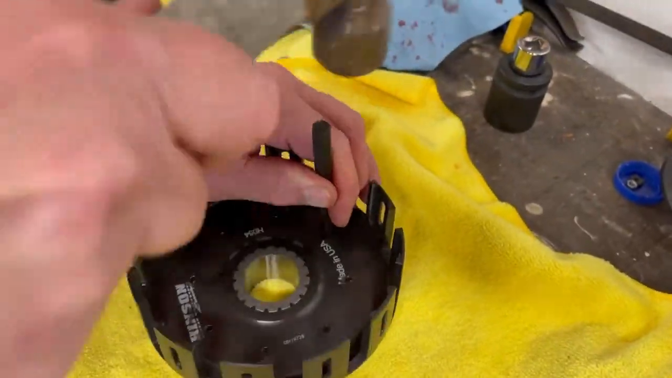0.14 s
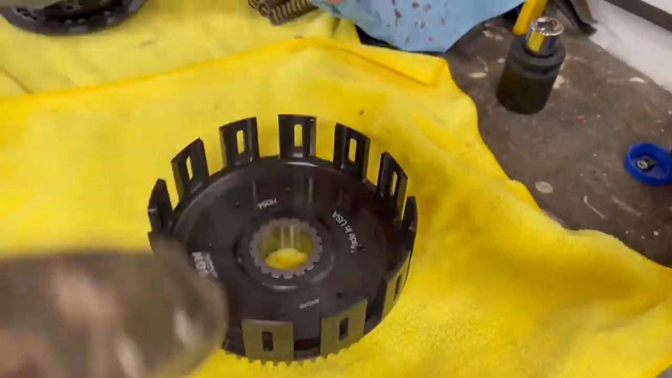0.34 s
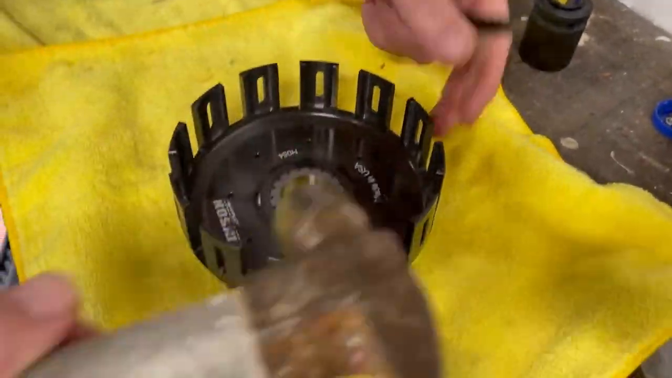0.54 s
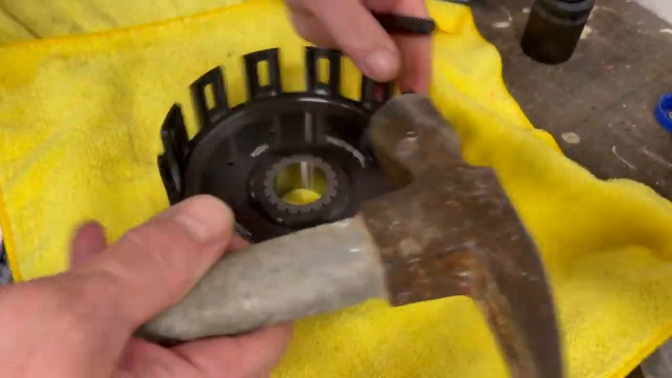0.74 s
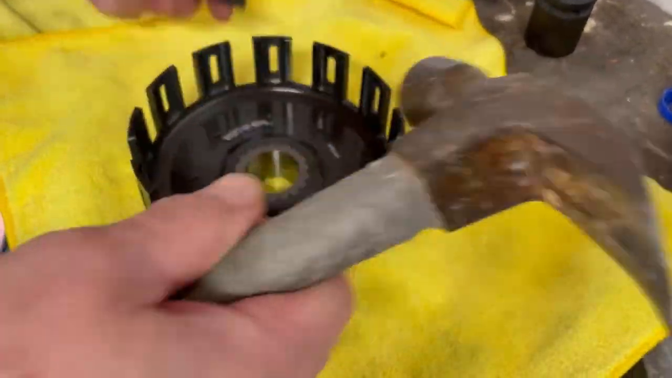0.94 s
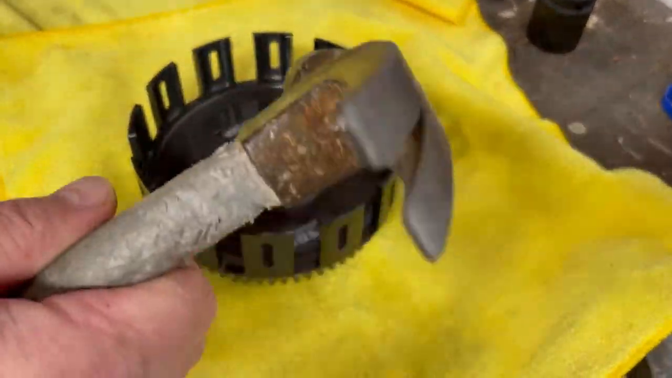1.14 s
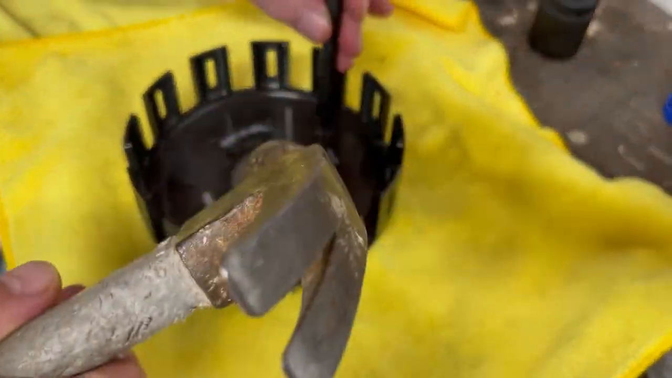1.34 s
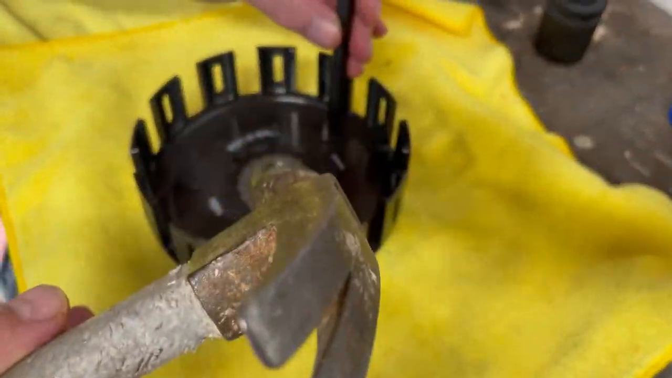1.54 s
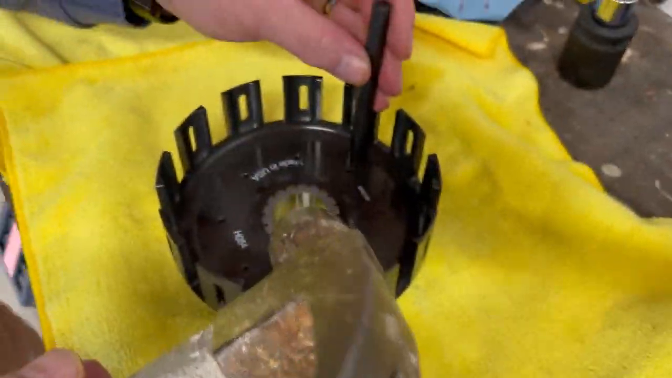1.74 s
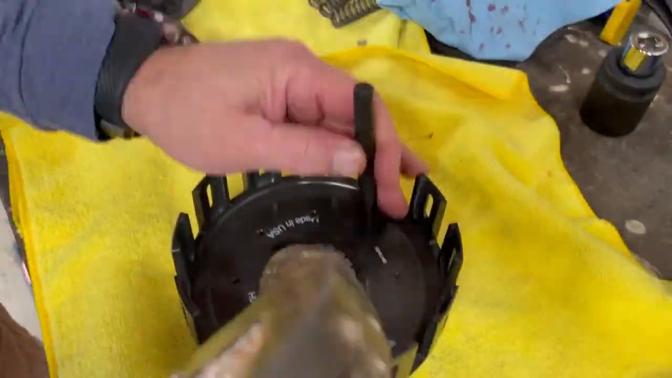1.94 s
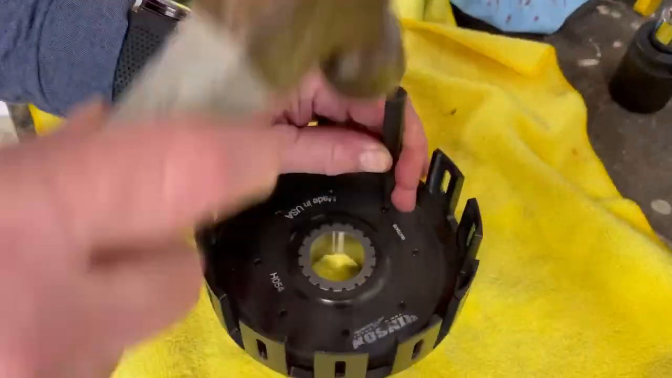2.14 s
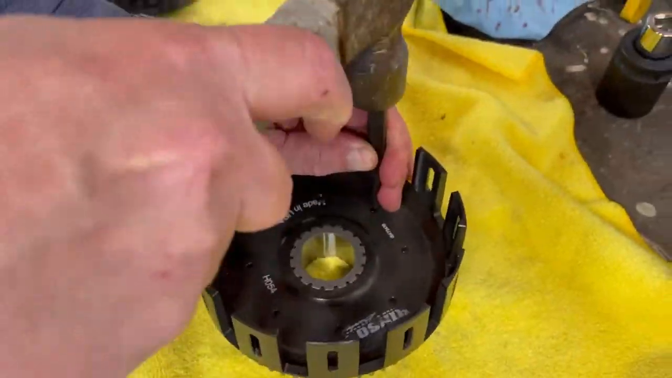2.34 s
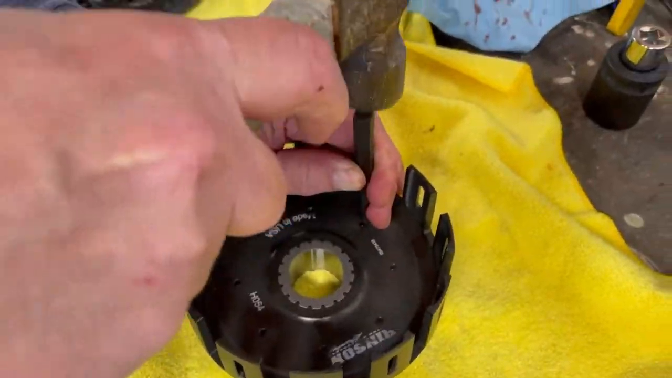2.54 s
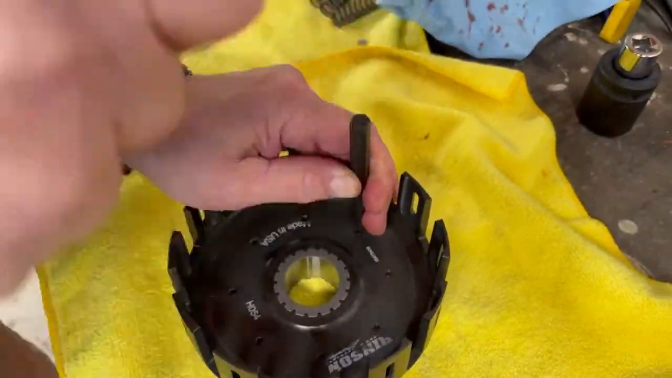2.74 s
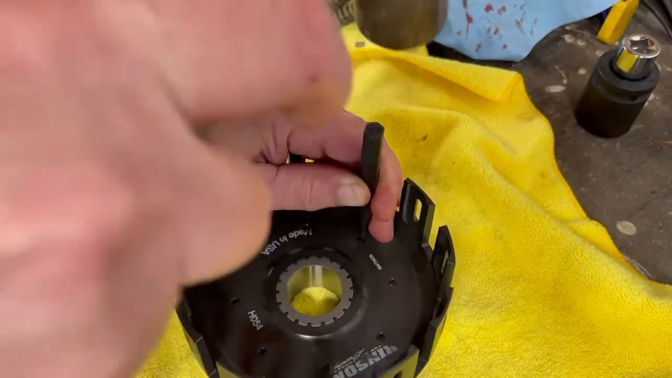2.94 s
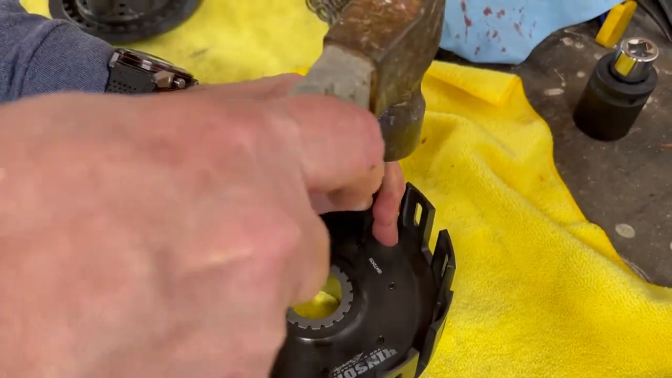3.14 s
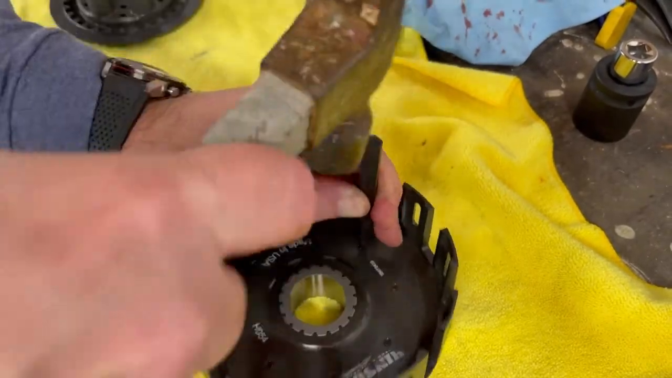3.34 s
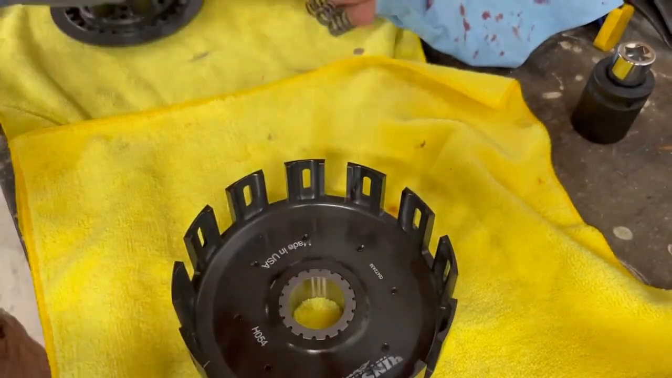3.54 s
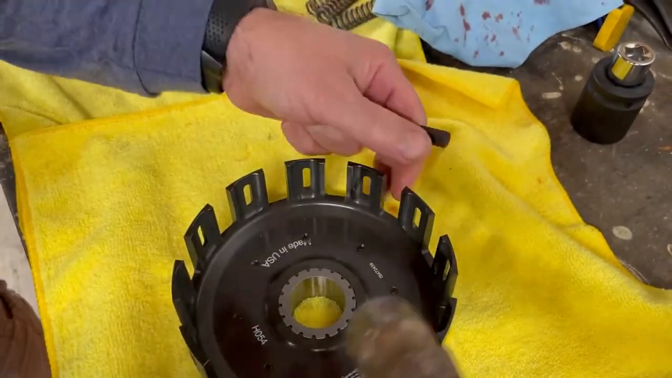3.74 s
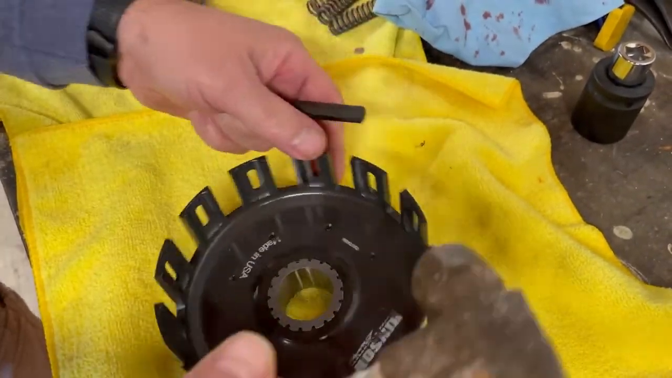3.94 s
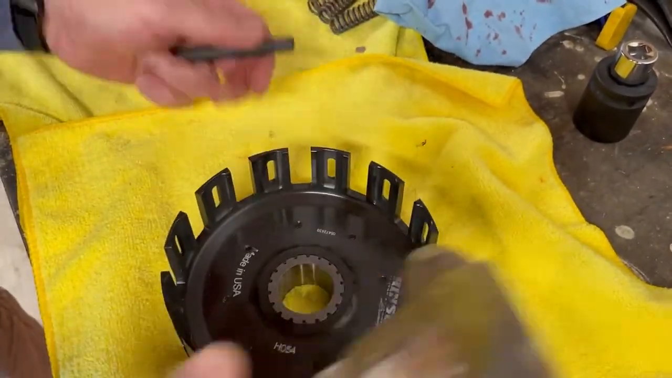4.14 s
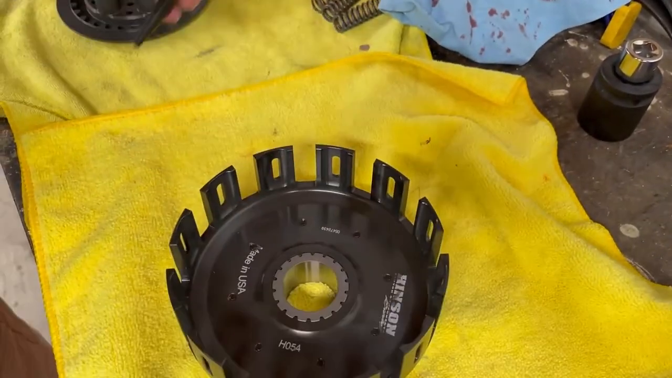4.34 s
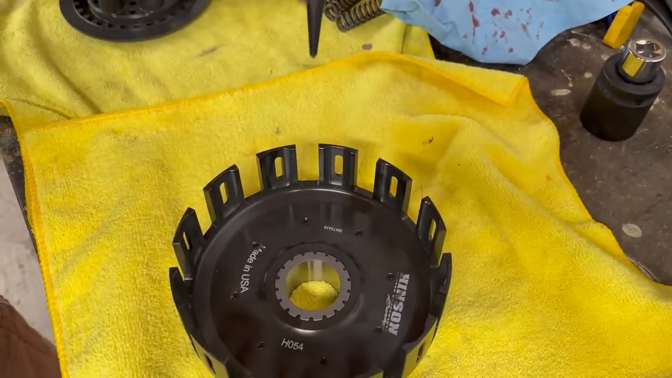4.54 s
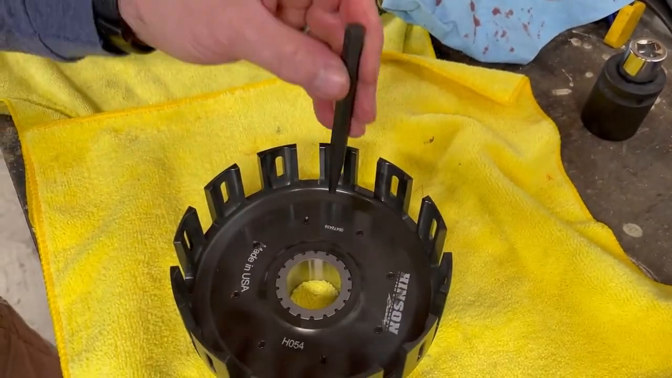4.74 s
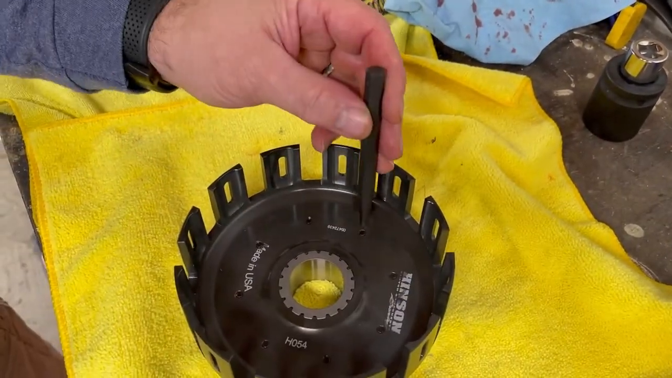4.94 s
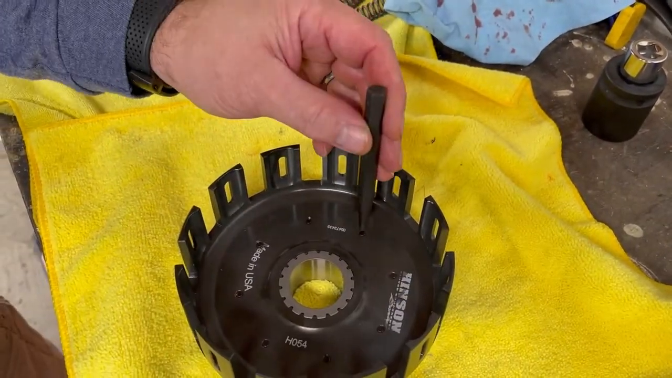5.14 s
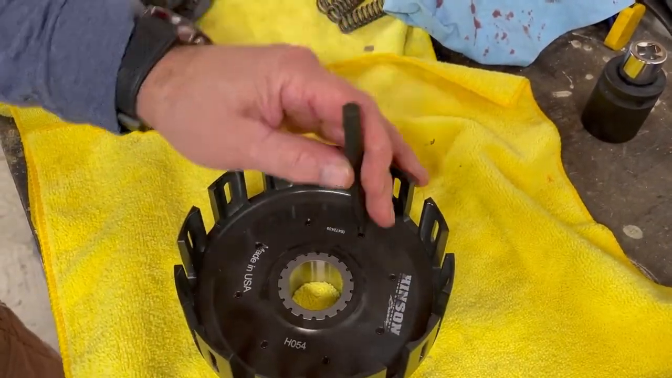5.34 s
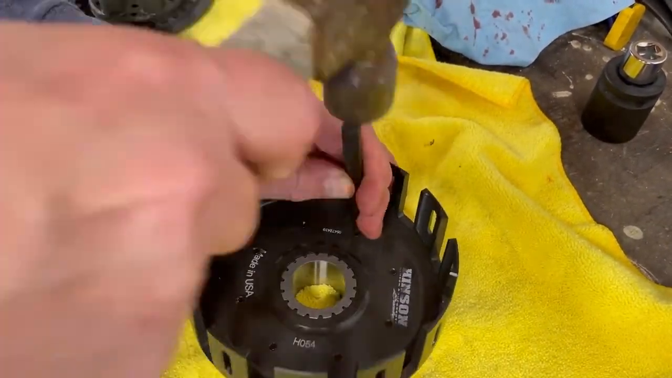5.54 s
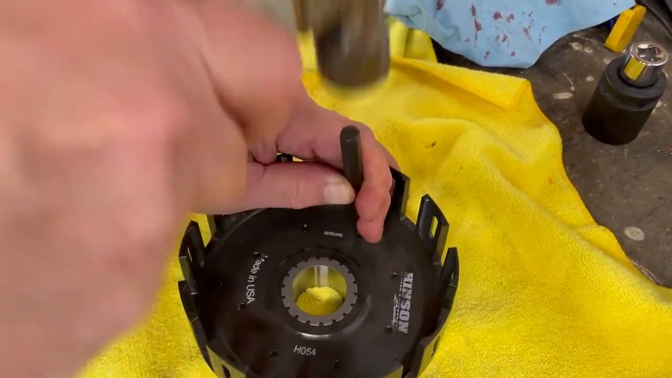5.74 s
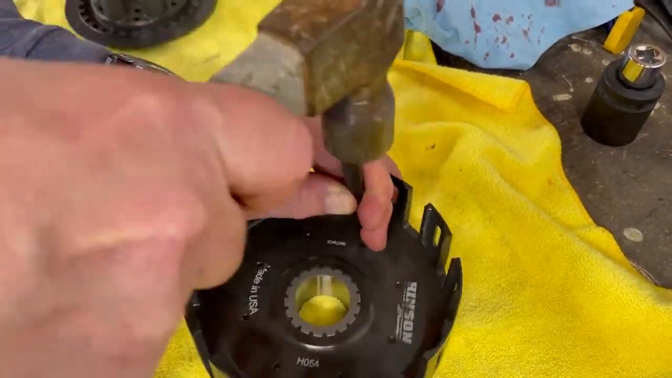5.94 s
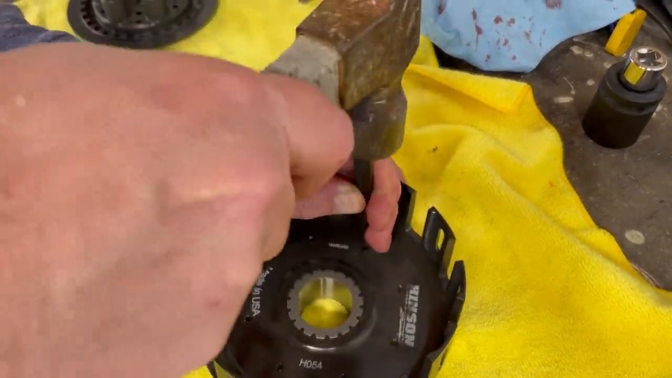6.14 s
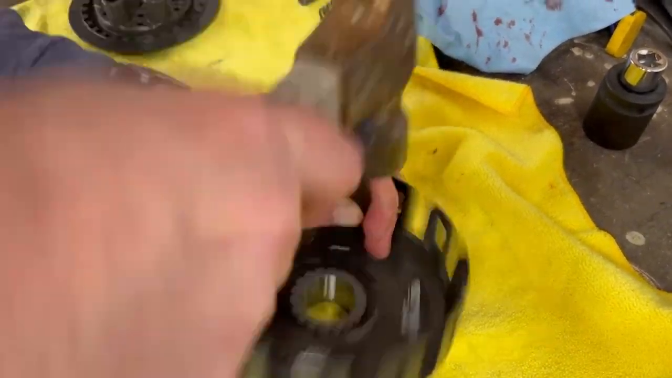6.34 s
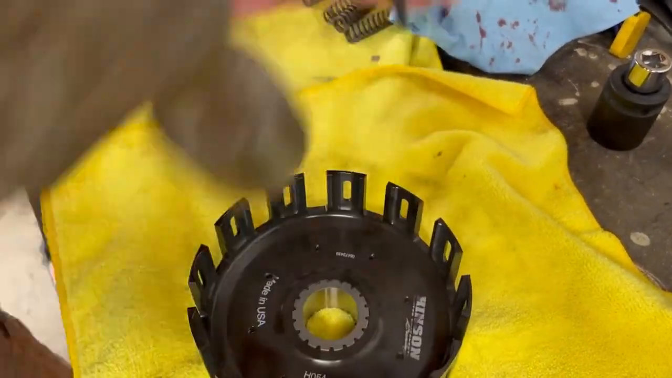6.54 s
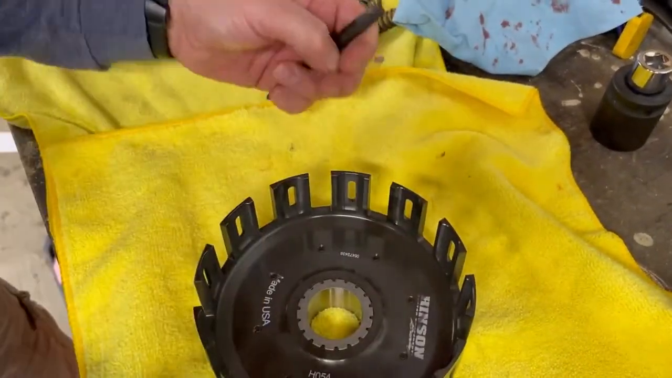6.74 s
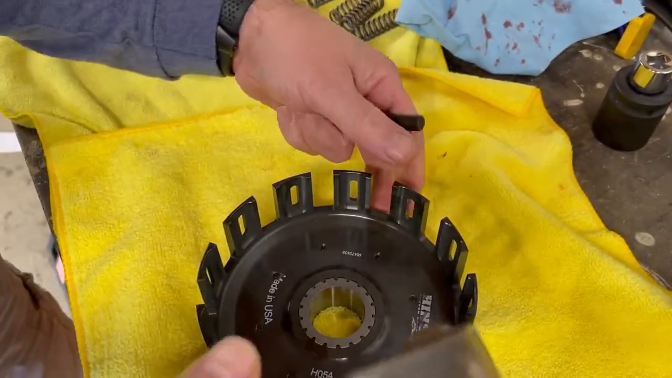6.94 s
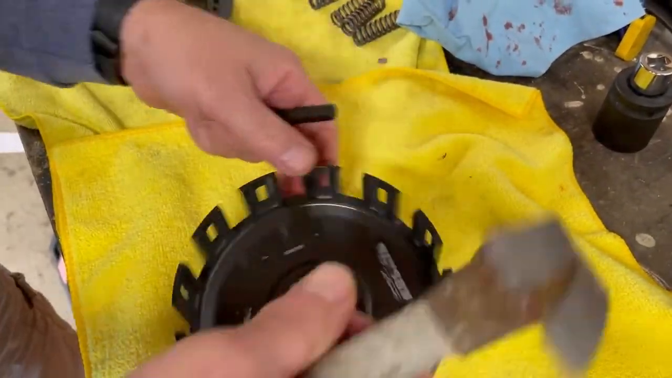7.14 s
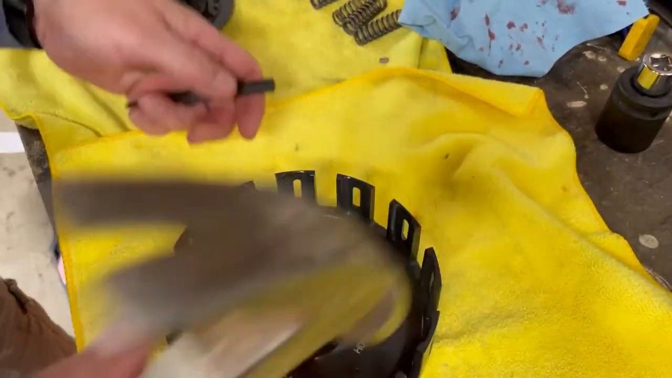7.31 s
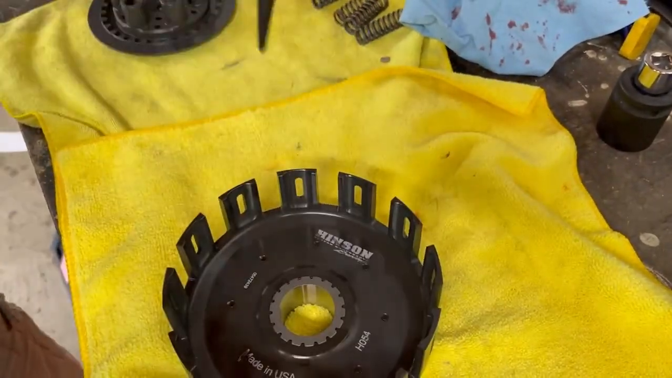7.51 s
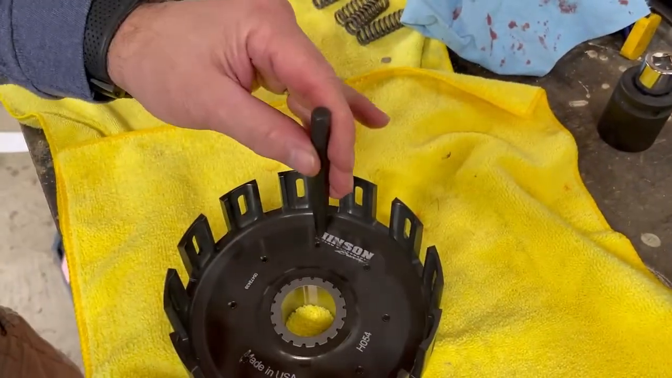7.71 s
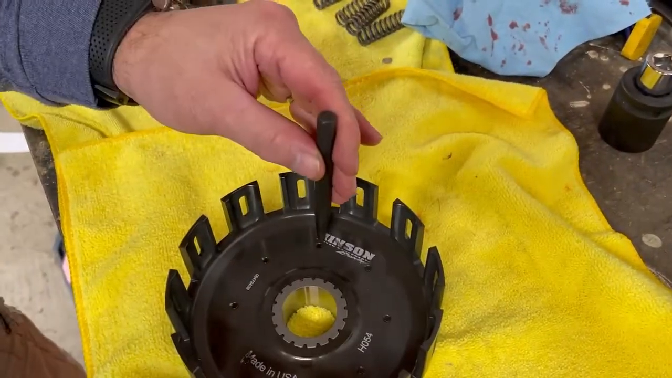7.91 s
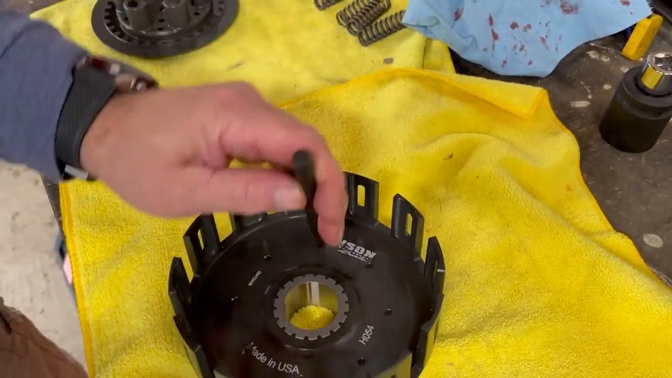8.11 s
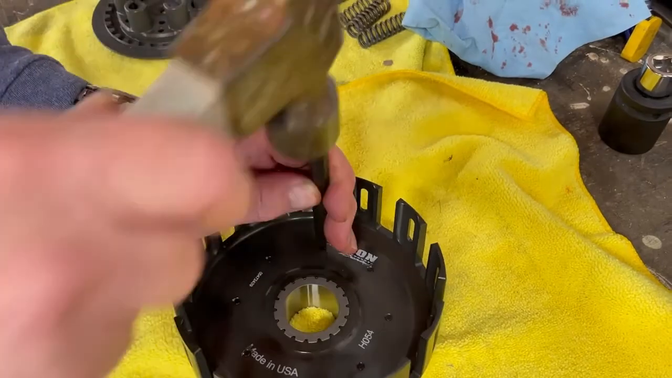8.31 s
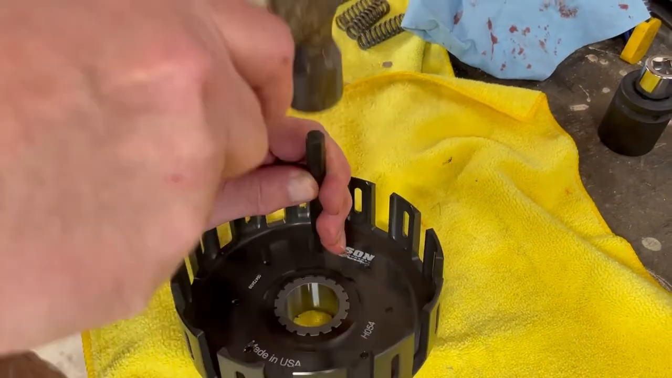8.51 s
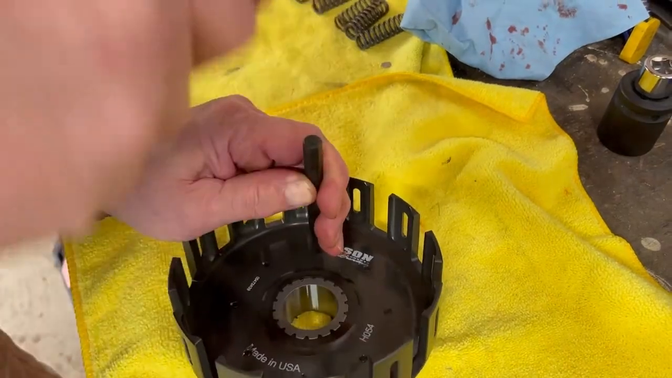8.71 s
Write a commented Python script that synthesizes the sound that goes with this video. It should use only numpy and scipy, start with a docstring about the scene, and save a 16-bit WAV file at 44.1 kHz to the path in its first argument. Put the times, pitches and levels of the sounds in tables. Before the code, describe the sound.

A small workshop heard from close by, in stereo, over very faint low rumble. The tail of a hammer blow opens the scene, then a solid clack with a strong bench thump lands at 0.1 seconds. Soft cloth rustle follows, with tiny metal ticks around 1.5 and a clearer one at 1.7, more near 2. From 2.3 to 3.3 five blows come about a quarter second apart: two light taps, a firmer one, a very hard crack at 2.8, a medium one, then another hard one. Light ticks and cloth brushing fill 3.5 to 3.9; then near quiet until small touches after 5.1. Four blows fall between 5.6 and 6.4, alternating medium and piercingly hard. Faint handling and ticks return from 7.1 to 8.1. Two soft taps at 8.4 and 8.6 lead to a loud final clack at 8.7. Every blow is short and dry, with a bench knock and quickly fading room tail.

```python
"""Hammer blows on a steel pin punch open the scene: each clinks the punch, clacks a cast basket lying
on a cloth and thumps the workbench below; a small workshop answers. Blows come in bursts; between them
the punch ticks on the basket, hands rustle on the cloth and the building rumbles.
Struck bodies are sums of decaying modes, the bench adds a delayed thump, the room is a tail of shaped
noise, and rumble, murmur and rustle are filtered noise under level curves."""
import sys
import numpy as np
from scipy import signal
from scipy.fft import rfft, irfft, next_fast_len
from scipy.io import wavfile
from scipy.ndimage import uniform_filter1d, minimum_filter1d

SR = 44100
rng = np.random.default_rng(int(sys.argv[2]) if len(sys.argv) > 2 else 0)


def pcm_store(signal):
    """Save signal as 16-bit PCM."""
    levels = np.round(np.clip(np.atleast_2d(signal), -1, 1) * 32767)
    wavfile.write(sys.argv[1], SR, levels.astype(np.int16).T)


N = 391166

# background level: (time [s], rumble level [dB], murmur level [dB])
BACKGROUND_LEVELS = [(0, -62, -76), (.46, -65, -78), (.69, -71, -82.5), (.9, -66.5, -80), (1.37, -69, -88),
                     (2.2, -64, -80), (2.6, -68, -81), (3.67, -65.5, -84), (4.3, -68, -80),
                     (4.62, -63.5, -77.5), (4.93, -69.5, -81), (5.18, -67, -83), (5.6, -71.5, -77.5),
                     (6.2, -67, -87), (6.8, -65, -81.5), (7.05, -70, -77.5), (7.43, -66, -85),
                     (7.63, -75, -87), (7.84, -72.5, -81), (8.02, -74, -87), (8.2, -69.5, -77),
                     (8.4, -69.5, -86), (8.87, -69, -82)]
# noise spectra, relative: (frequency [Hz], level [dB per Hz])
RUMBLE_SPECTRUM = [(12, -41), (20, -14.5), (53, -9.5), (70, -2), (87, -5), (166, -13), (197, -23),
                   (455, -32.5), (500, -29.5), (650, -66.5), (1100, -120)]
MURMUR_SPECTRUM = [(120, -26.5), (200, -6), (332, -15), (504, -12.5), (775, -10), (1830, -16), (2640, -19),
                   (3610, -30.5), (4500, -36), (5850, -65), (9900, -120)]
RUSTLE_SPECTRUM = [(1470, -34), (2500, -7.5), (2950, -2.5), (3580, -10.5), (4310, -2.5), (5880, -10.5),
                   (9340, -5), (10100, -15.5), (11200, -10), (12400, -38.5), (13000, -43.5)]
# left-right likeness of diffuse sound: (frequency [Hz], correlation [-1 to 1])
STEREO_LIKENESS = [(60, 1), (240, 0.83), (950, 0.68), (3770, 0.26), (15000, -0.22)]
# hands and basket brushing the cloth: (start [s], length [s], rustle level [dB], dull drag level [dB])
BRUSHES = [(.7, .22, -72, -74), (1.235, .02, -80, -95), (1.945, .03, -79, -90), (2.05, .07, -78, -82),
           (3.45, .1, -80, -78), (3.88, .3, -85, -86), (5.235, .022, -73, -85), (5.398, .022, -72, -85),
           (7.05, .04, -74, -82), (7.1, .2, -86, -86), (7.215, .025, -70, -84), (7.42, .09, -78, -92),
           (8.07, .08, -81, -90), (8.24, .025, -79, -90)]
# tail decay before the extra fade: (frequency [Hz], t60 [s])
ROOM_DECAY = [(60, 1), (200, 0.4), (1000, 0.65), (4000, .5), (12000, 0.54)]
# tail colour: (frequency [Hz], level [dB])
ROOM_COLOUR = [(40, -2.5), (170, 0), (500, 4), (1500, -1.5), (3500, -2), (8000, -4), (11500, -6.5),
               (13500, -24.5)]
# nominal modes of the bodies, scattered at each contact: (frequency [Hz], level [dB], t60 [s]);
# the frame is relative to the thump, the rim modes live longer
FRAME_MODES = [(35.2, -27, .5), (62, -24.5, .4), (91, -14.5, 0.17), (125, -16.5, 0.16), (318, -5, 0.031),
               (383, -7.5, 0.023)]
RIM_MODES = [(1260, 0.1, 0.032), (2560, -12, 0.059), (4230, -16, 0.022), (4900, -13, 0.07),
             (5560, -15, 0.077)]
BASKET_LOW_MODES = [(407, -2.5, 0.017), (602, -1, .025), (880, 0, 0.015), (1158, -2, 0.018),
                    (1500, -6.5, .015), (1666.7, -8, 0.012)]
BASKET_HIGH_MODES = [(2150, -4, 0.022), (2469, -3, 0.019), (2920, -4.5, 0.024), (3160, -10, 0.03)]
PUNCH_MODES = [(4212, -9, 0.045), (4290, -5, 0.0086), (4800, -6, 0.019), (5300, -4.5, 0.023),
               (5570, -5, 0.019), (6240, -11.5, 0.005), (6240, -9.5, 0.038), (6800, -12, 0.039),
               (7790, 2.5, .012), (8330, 0, 0.018), (8430, -8, 0.036), (8910, -6.5, 0.035),
               (9400, -5.5, .012), (10970, -3, .012), (11450, -1, 0.0075), (12200, -13.5, 0.0046),
               (15300, -29, .008)]
# light touches and rebounds of the punch: the first eight columns of the blows
TOUCHES = [(.379, -55, -59, -65, -85, 2560, -9, 2), (1.461, -70, -62, -55, -47, 4230, -14, 1.5),
           (1.573, -85, -80, -80, -58, 2560, -9, 3), (1.592, -74, -72, -72, -54, 2560, -9, 1.5),
           (1.703, -45, -36, -47, -30, 4230, -5, 3), (2.008, -55, -62, -69, -53, 2560, -13, 1.5),
           (2.0627, -51, -50, -67, -48, 2560, -9, 1.5), (2.081, -52, -50, -58, -75, 2560, -9, 2),
           (3.464, -58, -57, -64, -80, 2560, -9, 3), (3.518, -35, -62, -78, -80, 2560, -9, 1.5),
           (3.613, -54, -57, -65, -80, 2560, -9, 1.5), (3.71, -55, -65, -67, -49, 2560, -9, 1.5),
           (3.915, -52, -55, -66, -80, 2560, -9, 1.5), (5.1178, -64, -52, -57, -50, 4230, 5, .7),
           (5.126, -66, -52, -57, -57, 4230, 2, .7), (5.65, -66, -42, -30, -31, 2560, -18, 2.5),
           (5.712, -55, -47, -69, -80, 2560, -9, 1.5), (6.539, -66, -62, -70, -85, 2560, -9, .7),
           (6.554, -65, -64, -72, -85, 2560, -9, .7), (6.569, -63, -72, -75, -85, 2560, -9, .7),
           (6.579, -64, -66, -72, -85, 2560, -9, .7), (7.148, -80, -72, -63, -55, 2560, -12, 1.5),
           (7.772, -60, -59, -47, -44, 4230, -7, 1.5), (7.809, -80, -75, -60, -85, 2560, -9, 3),
           (7.9345, -42, -37, -44, -36, 2560, -9, 3), (8.113, -52, -52, -66, -80, 2560, -9, .9),
           (8.469, -68, -50, -46, -53, 2560, -11, 1.5)]
# hammer blows: (time [s], punch level [dB], basket high level [dB], basket low level [dB], rim level [dB],
# upper rim mode that sings out [Hz], its level re the rim [dB], chatter scale [ms], bench level [dB],
# bench pitch [Hz], metal in the room [dB re direct], bench in the room [dB re direct], tail hold [s])
HAMMER_BLOWS = [(-.098, -27, -30, -14, -30, 5560, 6, .9, -28, 170, -10, -17, .14),
                (.071, -20, -21, -16.5, -27, 5560, -5, 6, -2, 190, 3, -15, .1),
                (2.285, -47, -56, -36, -51, 5560, 1, 4.6, -23, 131, 0, -14, .047),
                (2.437, -27, -38.5, -20.5, -36, 4900, 9, 4, -19.5, 168, -3, -12.5, .04),
                (2.571, -15, -27, -10, -10, 4900, -11, 4, -10, 197, -9.5, -17.5, .068),
                (2.7894, 3, -9, 3.5, -17, 5560, -4, 3, -8, 222, -15, -8.5, .13),
                (3.047, -17, -21, -15, -10.5, 5560, -10, 3.2, -11.5, 185, -7.5, -18, .045),
                (3.2671, -7.5, -16.5, -5.5, -21, 2560, -8, 4.2, -2, 202, -7, -18.5, .12),
                (5.602, -20.5, -24.5, -17, -24.5, 4230, -6, 6.6, -16.5, 155, -12, -13, .057),
                (5.8484, 2, -3.5, 4.5, -13.5, 2560, -8, 2, 2.5, 178, -13.5, -16.5, .096),
                (6.0663, -15.5, -18, -12.5, -15.5, 4900, -10.5, 2, -21.5, 153, -17, -15.5, .07),
                (6.3453, 0, -9.5, 2, -11, 4900, -13, 1.6, -3, 186, -13.5, -15, .12),
                (8.4087, -43, -47, -32, -34, 4900, -6, 3.5, -25, 173, -1, -7.5, .045),
                (8.5832, -36, -46.5, -27, -36, 2560, -6, 3.3, -19, 191, -4, -16.5, .05),
                (8.738, -10, -19.5, -3, -12.5, 5560, -8, 2.3, -2.5, 180, -7.5, -11, .066)]
# microphone response: (frequency [Hz], level [dB])
MICROPHONE_RESPONSE = [(20, 1), (11500, 1), (13000, -5), (15500, -16), (16800, -39.5)]

TOP_HZ = 17000
AFTER_DB, AFTER_T60_S = -51, 1.4  # rumble added after a blow, re the bench thump
BRUSH_ATTACK_S, BRUSH_RELEASE_MAX_S, RUSTLE_FLOOR_DB = .008, .04, -89
BENCH_DELAY_MS, DELAY_PER_CHATTER = 1.1, .45  # base delay, further ms per ms of chatter
# harder blows are brighter and ring shorter: value at 0 dB of punch, change per dB of punch
BRIGHT_DB_PER_OCTAVE, BRIGHT_PER_DB = 1.1, .28
RING_LENGTH, RING_PER_DB = .65, -.022  # factor on the decay times
BLOW_UPPER_RIM_DB = -2.5
# shared by all touches
TICK_BENCH_DB, TICK_BENCH_HZ = -22, 170  # level re the punch
TICK_ROOM_DB, TICK_BENCH_ROOM_DB, TICK_HOLD_S = -9, -16, .04
TICK_UPPER_RIM_DB, TICK_BRIGHT_DB_PER_OCTAVE, TICK_RING_LENGTH = -13, -1.5, .8


def amp(db):
    """Decibels express the logarithm of an amplitude ratio; this returns the ratio."""
    return 10 ** (np.asarray(db) / 20)


def unit(x):
    """Rms is the root of mean power; x is scaled to rms 1."""
    return x / np.sqrt(np.mean(x ** 2) + 1e-20)


def along(points, hz):
    """Pitch is logarithmic in frequency: (Hz, value) points are joined on a log axis."""
    f, v = np.transpose(points)
    return np.interp(np.log(hz + 1), np.log(f + 1), v)


def curves(rows):
    """A slow level is linear between breakpoints: one value per sample for each column after the time."""
    s, *columns = np.transpose(rows)
    return [np.interp(np.arange(N) / SR, s, column) for column in columns]


def filtered(x, response):
    """A linear filter multiplies the spectrum by its frequency response."""
    m = next_fast_len(x.shape[-1] + 8192)
    spectrum = rfft(x, m) * response(np.fft.rfftfreq(m, 1 / SR))
    return irfft(spectrum, m)[..., :x.shape[-1]]


def diffuse(pair, spectrum):
    """Diffuse fields correlate between two ports mostly in the bass: two noises mix as mid and side."""
    def mid_side_response(hz):
        angle = np.arccos(np.clip(along(STEREO_LIKENESS, hz), -1, 1)) / 2
        return amp(along(spectrum, hz)) * [np.cos(angle), np.sin(angle)]

    mid, side = filtered(pair, mid_side_response)
    return np.array([mid + side, mid - side])


def rush(spectrum, patchy_db):
    """Turbulent noise fluctuates in time and frequency: stereo noise of rms 1 with patches of random gain."""
    z = signal.stft(rng.standard_normal((2, N)), nperseg=512)[2]
    field = uniform_filter1d(rng.standard_normal(z.shape[1:]), 6, 0)
    field = uniform_filter1d(field, 8, 1)
    noise = signal.istft(z * amp(patchy_db * unit(field)), nperseg=512)[1][:, :N]
    return unit(diffuse(noise, spectrum))


def building_rumble(level_db):
    """Low-frequency noise, to which each blow adds a component decaying exponentially."""
    t = np.arange(SR) / SR
    level = np.pad(amp(level_db), (0, SR))
    for s, *_, bench_db, _, _, _, _ in HAMMER_BLOWS:
        level[round(max(s, 0) * SR):][:SR] += amp(bench_db + AFTER_DB - 60 * t / AFTER_T60_S)
    return level[:N] * rush(RUMBLE_SPECTRUM, patchy_db=.15)


def with_brushes(level, column):
    """Friction noise lasts as long as the sliding: each brush rises, holds and dies away."""
    t = np.arange(SR) / SR
    level = np.pad(level, (0, SR))
    for row in BRUSHES:
        s, length = row[:2]
        rise = np.clip(t / BRUSH_ATTACK_S, 0, 1)
        release_s = min(length / 2, BRUSH_RELEASE_MAX_S)
        fall = np.exp(-np.clip(t - length, 0, 1) / release_s)
        level[round(s * SR):][:SR] += amp(row[column]) * rise * fall
    return level[:N]


def shop_murmur(level_db):
    """Faint mid-band noise, raised by the dull friction of each drag on the cloth."""
    return with_brushes(amp(level_db), 3) * rush(MURMUR_SPECTRUM, patchy_db=2.5)


def cloth_rustle():
    """Friction on cloth is irregular: cubed noise, smoothed, makes the gain of treble noise scratchy."""
    level = with_brushes(np.full(N, amp(RUSTLE_FLOOR_DB)), 2)
    uneven = uniform_filter1d(rng.standard_normal(N) ** 3, size=300)
    scratch = amp(2.2 * unit(uneven))
    return level * unit(scratch * rush(RUSTLE_SPECTRUM, patchy_db=3.5))


def background():
    """Sound pressures superpose: rumble, murmur and rustle are summed."""
    rumble_db, murmur_db = curves(BACKGROUND_LEVELS)
    return building_rumble(rumble_db) + shop_murmur(murmur_db) + cloth_rustle()


def shop(x, hold_s):
    """Reverberation: quick clatter, then a tail that holds for a moment and fades fast."""
    noise = rng.standard_normal((2, SR // 2))[:, :round((.15 + 2 * hold_s) * SR)]
    hz, t, z = signal.stft(noise, SR, nperseg=256)
    fade_rate = along([(60, .2), (400, 1), (3000, 1.2), (9000, 1.7)], hz)[:, None]  # faster in the treble
    fade_db = -3.3 * np.logaddexp(0, (t - hold_s) / .017) * fade_rate
    held = amp(-60 * t / along(ROOM_DECAY, hz)[:, None] + fade_db)
    clatter = 1.2 * amp(-60 * t / .18)
    onset = 1 - np.exp(-t / .0026)
    tail = signal.istft(z * (held + clatter) * onset, SR, nperseg=256)[1]
    tail = diffuse(tail / np.linalg.norm(tail[0]), ROOM_COLOUR)
    return signal.fftconvolve(x.mean(0)[None], tail, axes=1)


def ring(modes, t, spread, tilt_db=0, length=1, scatter_db=3.2):
    """Modal superposition: decaying sines at new strengths, with port phases unlike by spread [rad, treble]."""
    hz, db, t60 = np.transpose(modes)[:, :, None, None]
    level = db + tilt_db * np.log2(hz / 7000) + rng.normal(0, scatter_db, hz.shape)
    port_phase = spread * hz / (hz + 450) * rng.standard_normal((len(hz), 2, 1))
    phase = rng.uniform(0, 2 * np.pi, hz.shape) + port_phase
    # random scatter shifts the modes a little at each contact
    hz = hz * (1 + .008 * rng.standard_normal(hz.shape))
    decay_db = -60 * t / np.clip(length * t60, .003, 2)
    waves = amp(level + decay_db) * np.sin(2 * np.pi * hz * t + phase)
    return waves.sum(0) / np.sqrt(len(hz))


def bench_thump(t, bench_db, bench_hz, chatter_ms):
    """Impulse response of the wood: a short swelling sine and the modes of the frame."""
    delay_ms = BENCH_DELAY_MS + DELAY_PER_CHATTER * chatter_ms
    late = np.clip(t - delay_ms / 1000, 0, 1)  # the cloth and the casting delay the push on the wood
    swell = late / .004 * np.exp(1 - late / .003)
    thump = swell * np.sin(2 * np.pi * bench_hz * late)
    frame = ring(FRAME_MODES, late, 1.5, scatter_db=2.2) * (1 - np.exp(-late / .003))
    return amp(bench_db) * (thump + 1.8 * frame)


def basket_clack(t, high_db, low_db, length):
    """Free vibration of the casting: its high and low modes ring together."""
    high = amp(high_db) * ring(BASKET_HIGH_MODES, t, 1.0, 0, length)
    low = amp(low_db) * ring(BASKET_LOW_MODES, t, .9, 0, length)
    return high + low


def basket_rim(t, rim_db, sing_hz, sing_db, upper_db):
    """Selective excitation: the rim mode nearest sing_hz takes the level sing_db."""
    sings = np.argmin([abs(hz - sing_hz) for hz, _, _ in RIM_MODES])
    modes = []
    for k, (hz, db, t60) in enumerate(RIM_MODES):
        level_db = sing_db if k == sings else db + upper_db * (k > 0)
        modes.append((hz, level_db, t60))
    return amp(rim_db) * ring(modes, t, .8, scatter_db=1.2)


def contact_crack(t, punch_db):
    """An impact is broadband: decaying white noise."""
    return amp(punch_db - 12) * amp(-60 * t / .021) * rng.standard_normal((2, len(t)))


def punch_clink(t, punch_db, tilt_db, length):
    """Free vibration of the steel punch: treble modes, their balance set by the tilt [dB per octave]."""
    return amp(punch_db + 1.9) * ring(PUNCH_MODES, t, .6, tilt_db, length)


def chatter(ms):
    """Repeated contact: uneven micro-contacts smear a blow over some ms, nearly without colouring it."""
    u = np.arange(2048) / SR / (abs(ms) / 1000 + 1e-4)
    z = rfft(rng.standard_normal(2048) * u * np.exp(-1.5 * u ** 2))
    power = np.abs(z) ** 2
    flat = z / np.sqrt(power + .03 * np.mean(power))
    return irfft(flat)[None, :SR // 50]


def strike(punch_db, high_db, low_db, rim_db, sing_hz, sing_db, chatter_ms, bench_db, bench_hz,
           metal_room_db, bench_room_db, hold_s, upper_db, tilt_db, length, size):
    """Impact transmission: steel on steel, passed to the basket and then the bench, size samples long."""
    t = np.arange(size) / SR
    short = t[:size // 5]
    crack = contact_crack(short, punch_db)
    punch = punch_clink(short, punch_db, tilt_db, length) + crack
    basket = basket_clack(short, high_db, low_db, length)
    rim = basket_rim(short, rim_db, sing_hz, sing_db, upper_db)
    metal = signal.fftconvolve(punch + basket + rim, chatter(chatter_ms), axes=1)
    bench = bench_thump(t, bench_db, bench_hz, chatter_ms)
    # the tail is fed mostly by the short blow, so it sounds less tonal
    blow = (punch + basket + 2.1 * crack) * amp(2.2 - 60 * short / .009)
    burst = .6 * rim + blow
    to_room = amp(metal_room_db) * burst + amp(bench_room_db) * bench[:, :len(short)]
    sound = np.zeros((2, SR))
    for part in shop(to_room, hold_s), bench, metal:
        sound[:, :part.shape[1]] += part
    return sound


def hammering():
    """Linear superposition of all blows and touches at their moments."""
    out = np.zeros((2, N + 2 * SR))  # one spare second at each end
    for s, db, *how in HAMMER_BLOWS:
        tilt_db = BRIGHT_DB_PER_OCTAVE + BRIGHT_PER_DB * db
        length = RING_LENGTH + RING_PER_DB * db
        sound = strike(db, *how, BLOW_UPPER_RIM_DB, tilt_db, length, size=SR // 2)
        out[:, round((s + 1) * SR):][:, :SR] += sound
    for s, db, *how in TOUCHES:
        sound = strike(db, *how, db + TICK_BENCH_DB, TICK_BENCH_HZ, TICK_ROOM_DB, TICK_BENCH_ROOM_DB,
                       TICK_HOLD_S, TICK_UPPER_RIM_DB, TICK_BRIGHT_DB_PER_OCTAVE, TICK_RING_LENGTH,
                       size=SR // 4)
        out[:, round((s + 1) * SR):][:, :SR] += sound
    return out[:, SR:SR + N]


def scene():
    """Superposition of the background and the hammering."""
    return background() + hammering()


def limiter(x, ceiling_db, release_db_per_s):
    """Peak limiting: the gain ducks under the loudest peaks and climbs back steadily."""
    need_db = np.minimum(0, ceiling_db - 20 * np.log10(np.abs(x).max(0) + 1e-9))
    climb_db = release_db_per_s * np.arange(N) / SR
    ahead_db = minimum_filter1d(need_db, size=89)  # ducks about 1 ms ahead of a peak
    gain_db = np.minimum.accumulate(ahead_db - climb_db) + climb_db
    return x * amp(uniform_filter1d(np.minimum(gain_db, 0), size=45))


def record(dry):
    """Transduction: microphone colour, a peak limiter, and nothing above the band limit."""
    heard = filtered(dry, lambda hz: amp(along(MICROPHONE_RESPONSE, hz)))
    limited = limiter(heard, ceiling_db=-.3, release_db_per_s=900)
    return filtered(limited, lambda hz: hz < TOP_HZ)


dry = scene()
out = record(dry)
pcm_store(out)
```